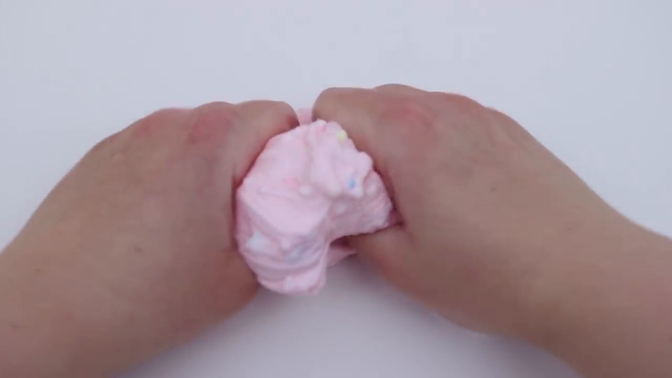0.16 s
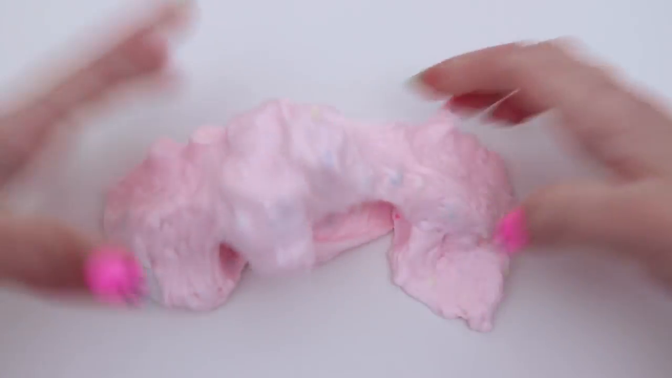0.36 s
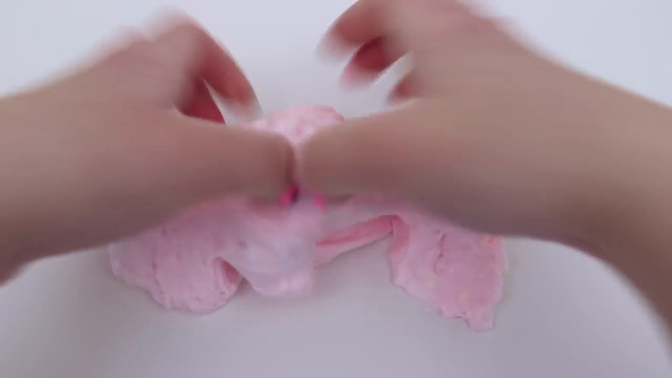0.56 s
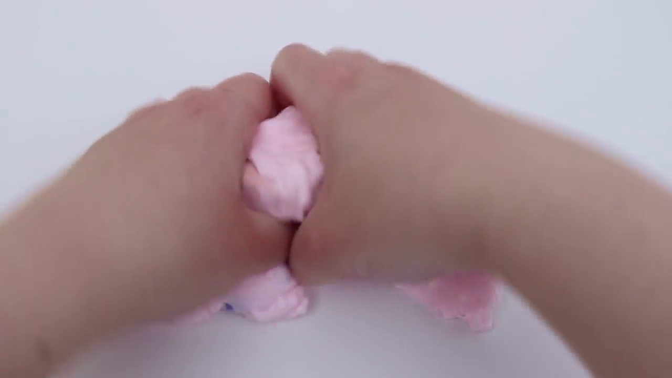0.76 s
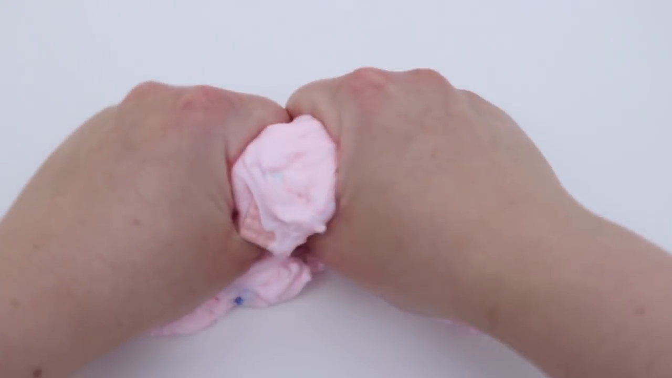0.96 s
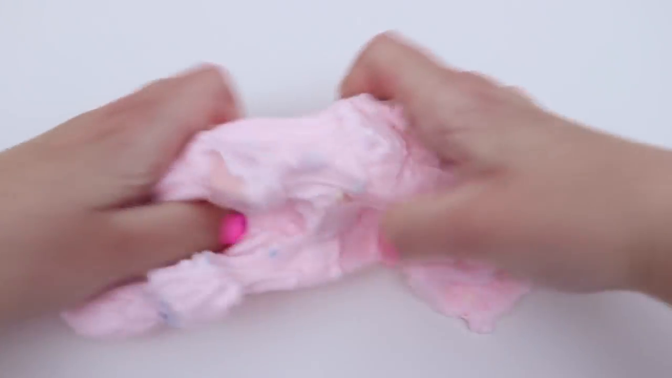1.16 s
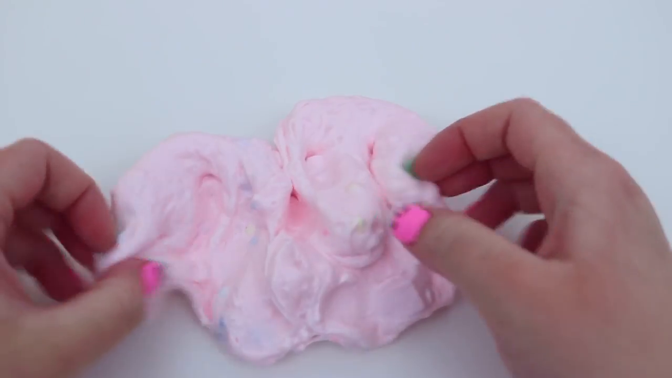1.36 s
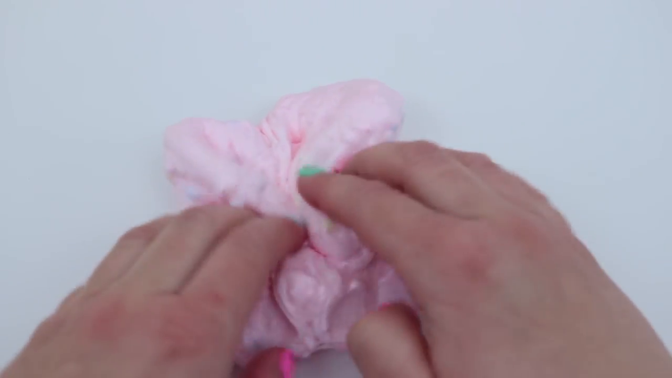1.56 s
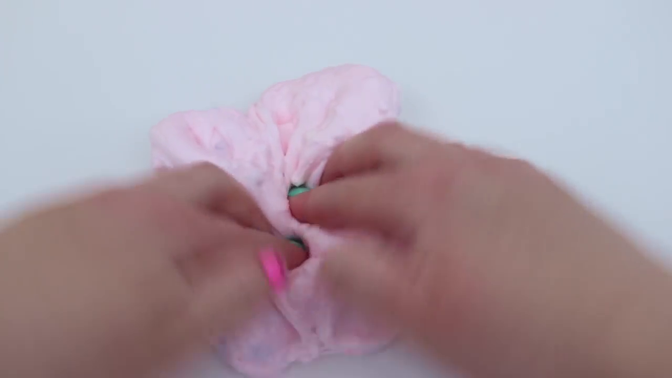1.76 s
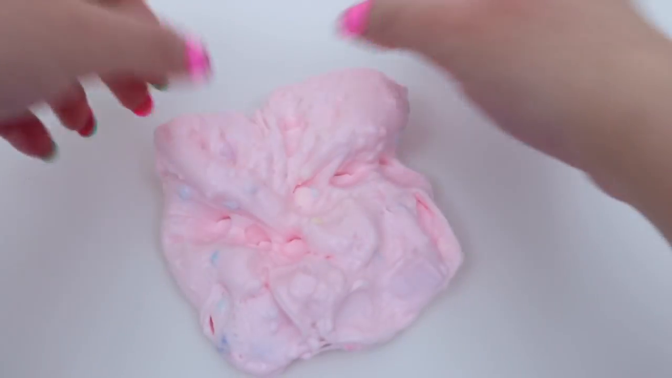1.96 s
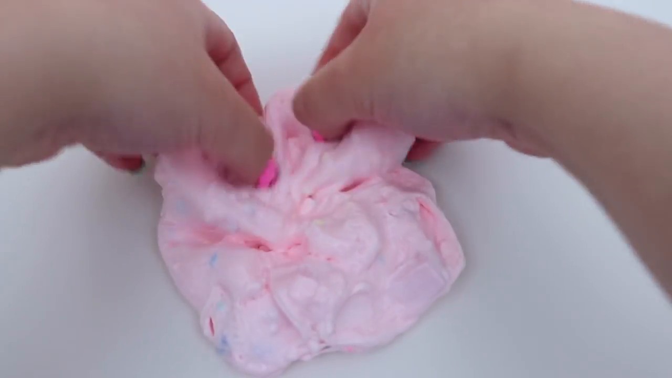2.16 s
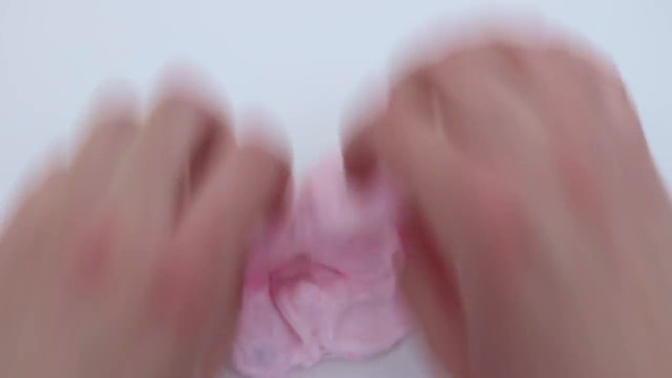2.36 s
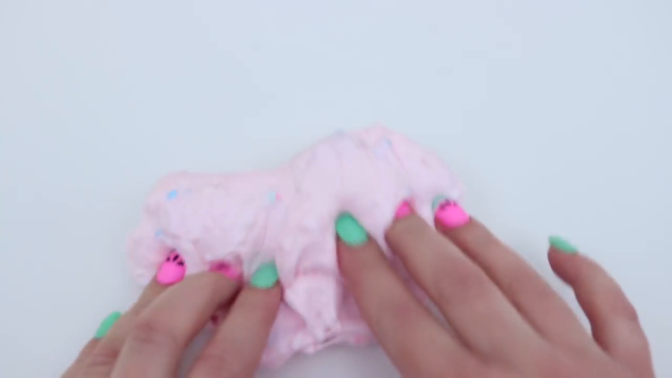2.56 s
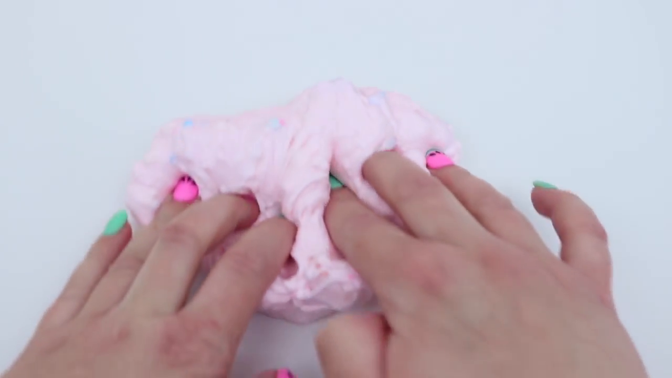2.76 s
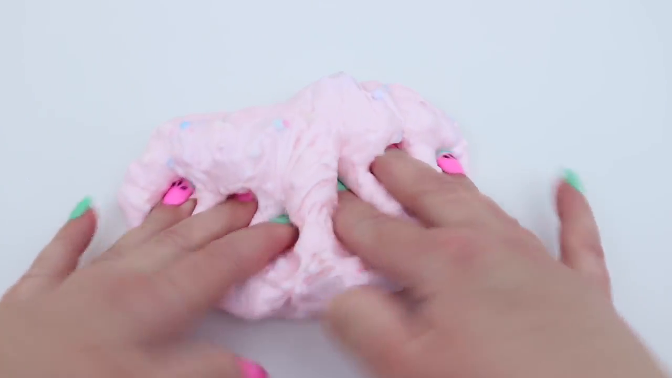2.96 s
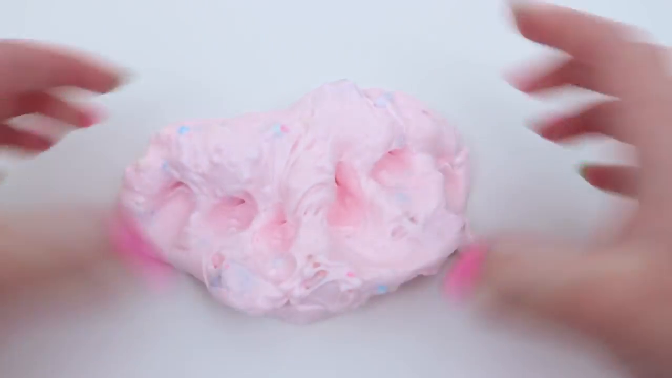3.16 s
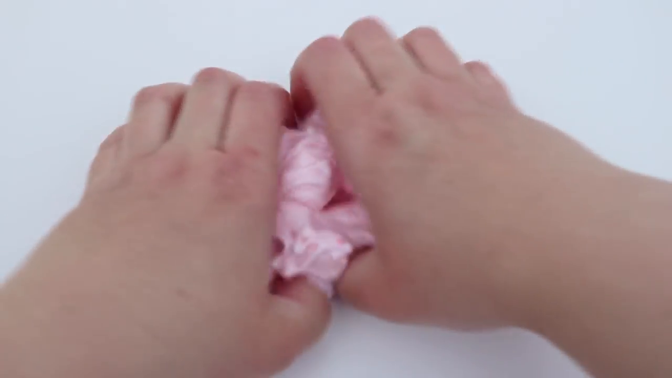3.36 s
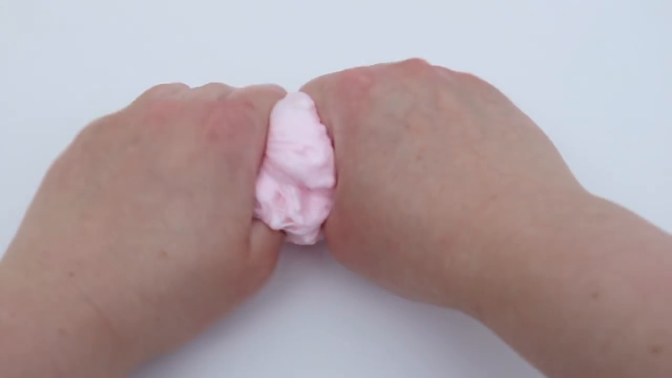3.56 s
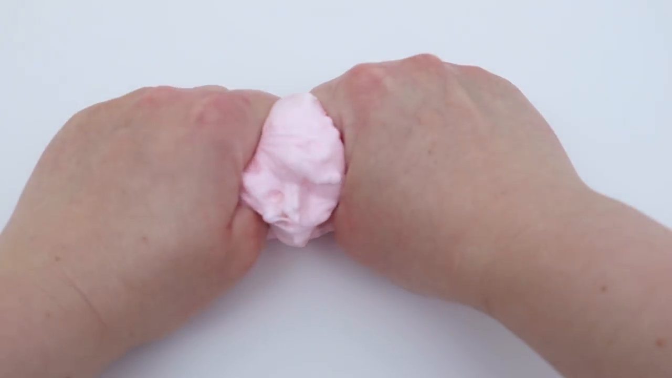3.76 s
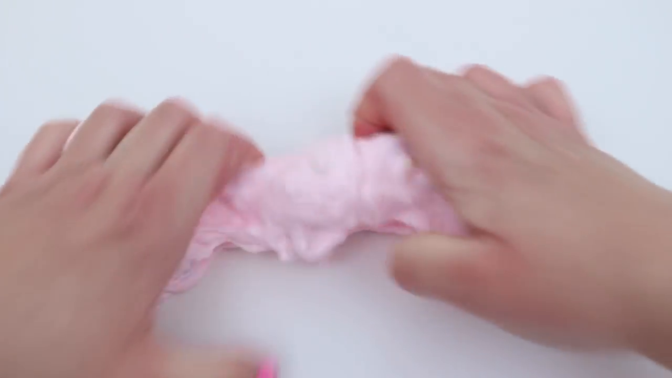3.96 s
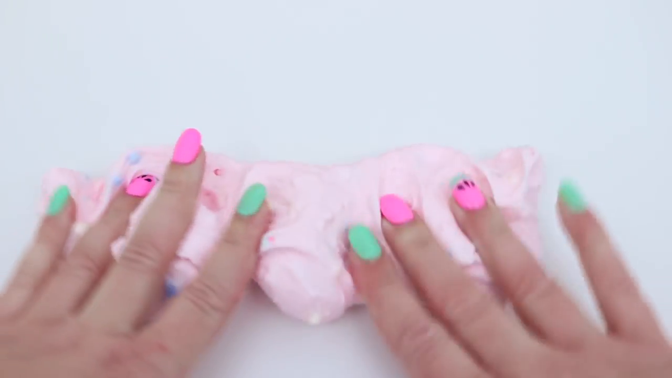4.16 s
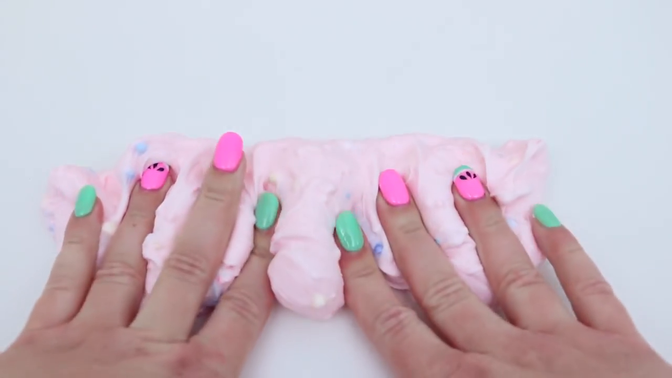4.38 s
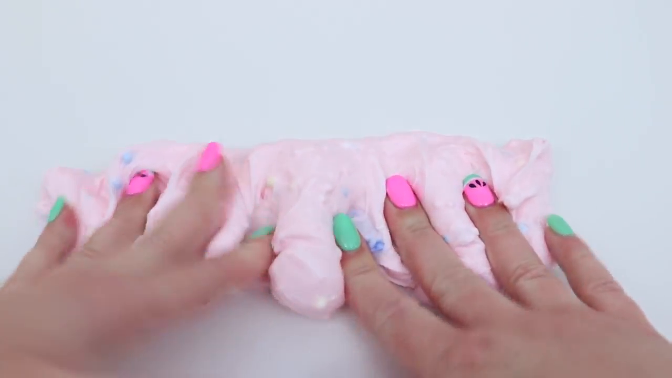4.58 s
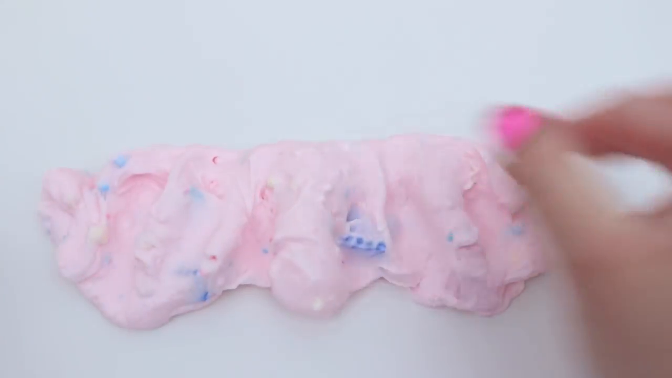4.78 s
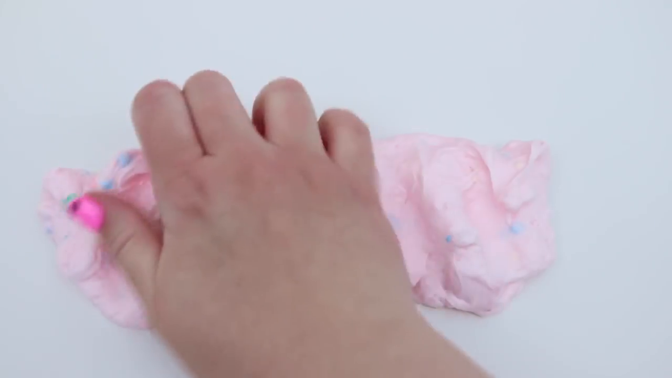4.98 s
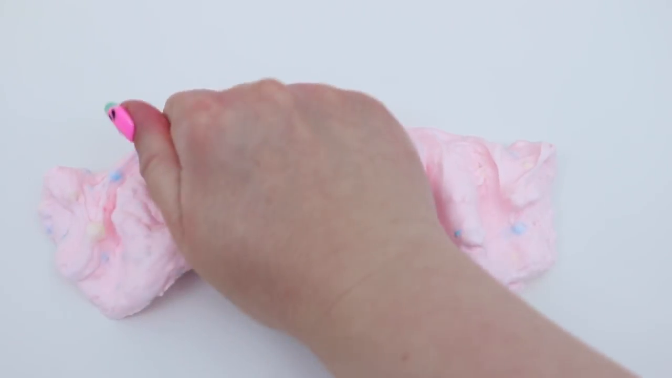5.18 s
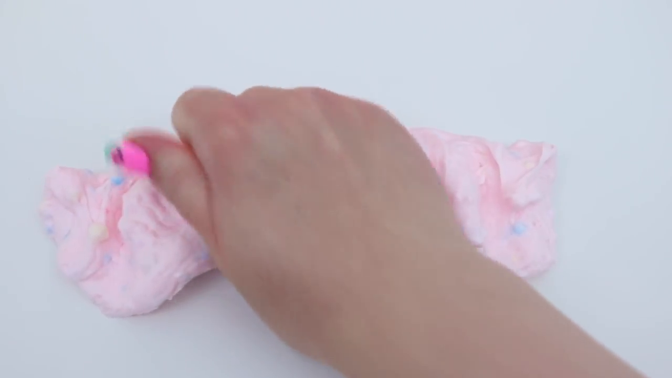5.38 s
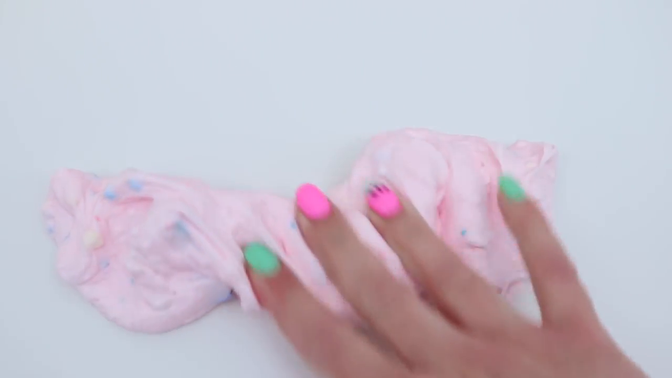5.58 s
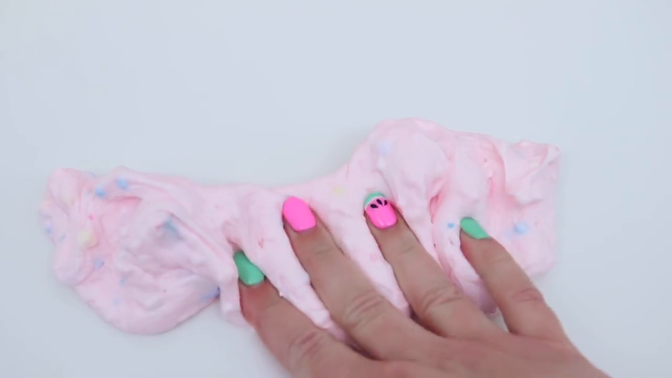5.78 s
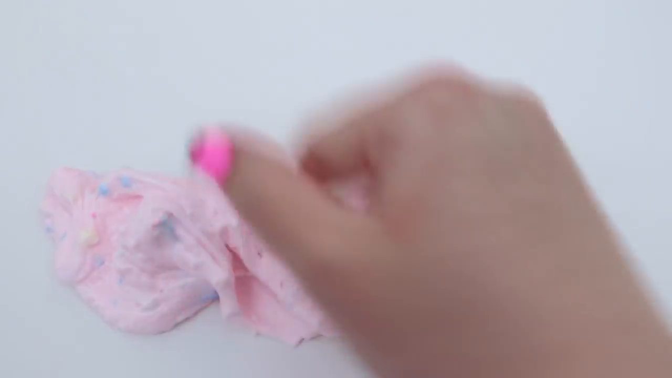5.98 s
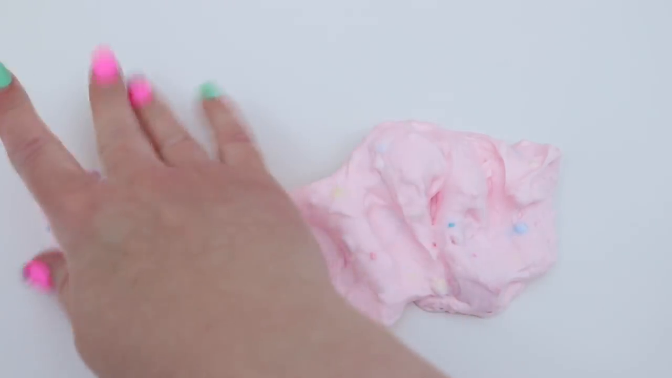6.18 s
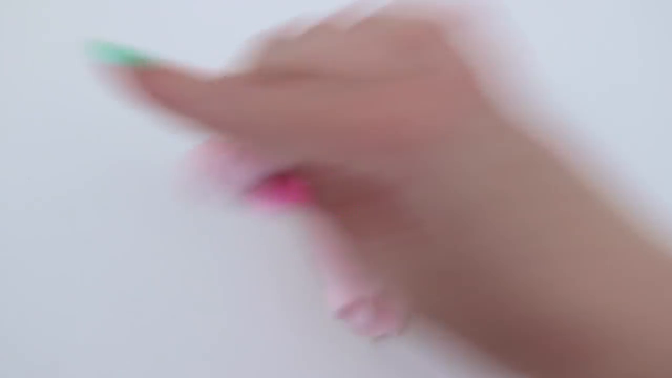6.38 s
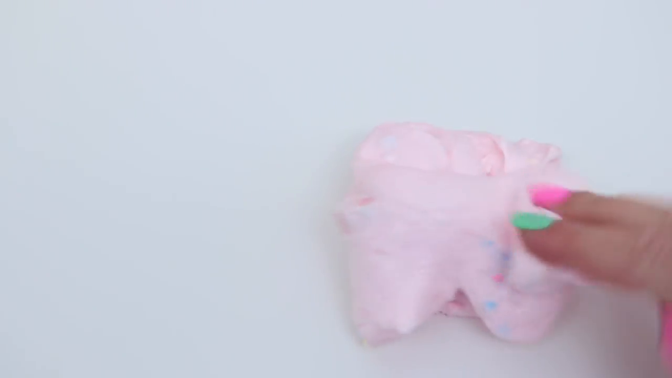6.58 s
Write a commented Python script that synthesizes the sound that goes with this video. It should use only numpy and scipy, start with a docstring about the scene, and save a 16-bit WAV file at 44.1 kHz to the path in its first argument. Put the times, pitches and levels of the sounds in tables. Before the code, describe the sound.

Hands knead sticky, bead-filled slime on a hollow table top, close to the microphone in a small quiet room. Each squeeze brings a dense wet crackle and a cluster of sharp little air pops, with brief lulls between strokes. Soft low thumps come from the table as the hands press down. The popping is loudest a little past halfway, eases off, returns in another flurry, then thins to faint ticks.

```python
"""A small quiet room: hands knead bead-filled slime on a hollow table top, close to the microphone.
Trapped air pockets burst as short pitched pops over a dense sticky crackle of tiny ones.
Pushes and fingertip knocks set the table top humming; shifts of weight bounce it on its legs.
A near wall and the room answer every pop, over faint room air and preamp noise."""
import sys
import numpy as np
from scipy import signal
from scipy.fft import rfft, irfft
from scipy.io import wavfile
from scipy.ndimage import uniform_filter1d

SR = 44100
rng = np.random.default_rng(int(sys.argv[2]) if len(sys.argv) > 2 else 0)


def pcm_store(signal):
    """Save signal as 16-bit PCM."""
    levels = np.round(np.clip(np.atleast_2d(signal), -1, 1) * 32767)
    wavfile.write(sys.argv[1], SR, levels.astype(np.int16).T)


N = 292383


def from_db(db):
    """Decibels to gain; from_db(2 * db) is power."""
    return 10 ** (np.asarray(db) / 20)


def unit_rms(x):
    """Scale to unit rms."""
    return x / np.sqrt(np.mean(x ** 2) + 1e-20)


def highpass(x, hz, order):
    """Butterworth high-pass."""
    return signal.sosfilt(signal.butter(order, hz, "high", fs=SR, output="sos"), x)


def ring(drive, hz, t60_s):
    """One mode: a unit click starts a decaying sine of height 1."""
    r, w = from_db(-60 / (t60_s * SR)), 2 * np.pi * hz / SR
    return signal.lfilter([np.sin(w)], [1, -2 * r * np.cos(w), r * r], drive + 1e-18)


def grains(per_s, spread_db):
    """Random clicks of uneven size and sign."""
    sizes = from_db(spread_db * np.minimum(rng.exponential(1, N), 4)) * rng.choice([-1, 1], N)
    return sizes * (rng.random(N) < per_s / SR)


def shaped_noise(size, spectrum):
    """Noise with a spectrum of (frequency [Hz], level [dB]) points."""
    hz, db = np.transpose(spectrum)
    bins_hz = np.maximum(np.fft.rfftfreq(size, 1 / SR), 1)
    gain = from_db(np.interp(np.log(bins_hz), np.log(hz), db))
    return irfft(rfft(rng.standard_normal(size)) * gain, size)


def swell(peak_s, swell_s, fade_s):
    """Power envelope peaking at 1: up 20 dB in swell_s, down 20 dB in fade_s."""
    t = np.arange(N) / SR - peak_s
    return 100. ** -np.where(t < 0, -t / swell_s, t / fade_s)


def air(level_db):
    """Steady room air and preamp noise."""
    # noise spectrum: (frequency [Hz], relative density [dB])
    spectrum = [(18, -25), (30, -12), (79, -5.5), (157, -5), (199, -5), (461, -17.5), (584, -26),
                (937, -25), (1130, -25), (3770, -36.5), (16000, -32)]
    return from_db(level_db) * unit_rms(shaped_noise(N + N % 2, spectrum)[:N])


def room(x):
    """Direct sound, two near echoes and a tail that dies band by band."""
    # reverberation bands: (centre [Hz], t60 [s], relative density [dB])
    tail_bands = [(350, .25, -8), (830, 0.08, -1), (2050, .2, 6), (3700, 0.23, 5.5), (6000, 0.053, -6),
                  (9000, 0.092, 4), (14000, 0.033, -13.5)]
    # early reflections: (delay [s], level [dB])
    echoes = [(.0042, -20), (.0095, -33)]
    tail_db, build_up_s = -16, 0.00067
    size = SR // 2
    t, response = np.arange(size) / SR, np.zeros(size)
    for hz, t60_s, db in tail_bands:
        band = shaped_noise(size, [(hz / 2, -30), (hz / 1.3, 0), (hz * 1.3, 0), (hz * 2, -30)])
        response += from_db(db - 60 * t / t60_s) * band
    response *= 1 - np.exp(-t / build_up_s)
    response *= from_db(tail_db) / np.sqrt(np.sum(response ** 2))
    response[0] = 1
    for delay_s, db in echoes:
        response[round(delay_s * SR)] += from_db(db)
    return signal.fftconvolve(x, response)[:N]


def kneading():
    """Strokes add in power over resting fingers; returns crackle level, treble ratio and push [dB]."""
    # fingers resting in the slime: (time [s], crackle [dB], push [dB])
    rest = [(0, -67, -60.5), (.5, -80, -59.5), (.7, -67, -68), (1.45, -62, -53), (2.05, -65.5, -68),
            (2.55, -62, -56.5), (2.8, -56.5, -49), (2.97, -73, -74), (3.17, -65, -48), (3.3, -75, -60.5),
            (3.8, -55, -72), (4.3, -65, -58), (4.9, -66.5, -63.5), (5.9, -71, -70), (6.05, -69, -58.5),
            (6.23, -67.5, -59), (6.63, -62, -59)]
    # squeezes and pulls: (peak [s], swell [s], fade [s], crackle [dB], treble ratio [dB], push [dB])
    strokes = [(0.001, .02, 0.28, -38, -6.5, -42.5), (.12, .02, 0.031, -34.5, -1, -37),
               (.343, 0.22, 0.083, -39, -6, -34), (0.41, 0.033, 0.022, -46.5, -4, -30.5),
               (0.679, 0.011, 0.12, -41, -4.5, -37.5), (.854, 0.13, 0.093, -42.5, -13.5, -35),
               (.894, .07, 0.25, -40.5, -5.5, -51), (1.006, .05, 0.064, -33.5, -3.5, -41.5),
               (1.187, .085, .2, -40, -6, -40), (1.519, 0.03, 0.056, -50, -6.5, -39),
               (1.74, .4, 0.078, -52.5, -7.5, -46), (1.846, 0.029, 0.095, -46.5, 3.5, -24),
               (1.884, 0.051, 0.033, -36.5, -23, -29.5), (1.901, 0.15, .012, -49, -8, -36),
               (2.107, 0.0099, 0.077, -47.5, -17, -45), (2.194, 0.011, 0.26, -44, -11, -38.5),
               (2.426, 0.038, 0.086, -44, -4, -40.5), (2.842, 0.024, 0.11, -49, -1, -42.5),
               (3.02, 0.018, 0.092, -55, -1, -48), (3.045, 0.05, 0.098, -40.5, -3, -26.5),
               (3.109, 0.071, 0.01, -37.5, -4.5, -25), (3.326, 0.0055, 0.21, -37.5, -23.5, -29),
               (3.52, 0.051, 0.1, -36.5, -10.5, -26), (3.616, .2, 0.036, -37, -2, -59),
               (3.678, 0.055, 0.1, -38, 1, -39), (3.903, 0.0085, 0.36, -39.5, -8, -31),
               (3.989, 0.077, 0.079, -29.5, -7.5, -23), (4.095, 0.044, 0.039, -48.5, -4, -35.5),
               (4.147, 0.12, .02, -48, -1, -37), (4.439, .03, 0.089, -63.5, 5, -55),
               (4.563, 0.013, 0.18, -54, 3.5, -45.5), (4.599, 0.048, 0.17, -45.5, -4.5, -34),
               (4.759, 0.066, 0.024, -46, -4.5, -31.5), (4.91, 0.0295, 0.26, -62, -15, -70.5),
               (5.067, 0.024, 0.41, -44, -35, -44), (5.18, 0.096, 0.13, -37.5, -4.5, -43.5),
               (5.259, .1, 0.041, -49.5, 0, -39.5), (5.428, 0.036, 0.1, -40, -5, -34.5),
               (5.52, 0.17, 0.012, -45.5, -20, -38.5), (5.572, 0.0064, 0.072, -35, -38, -30.5),
               (5.771, .4, 0.12, -56.5, -5, -50), (5.964, 0.039, 0.059, -40.5, -2, -30.5),
               (6.02, 0.21, 0.0101, -48, -1.5, -38.5), (6.322, .08, 0.21, -47.5, -12.5, -45.5),
               (6.447, 0.26, 0.017, -55, 0.5, -67), (6.614, 0.0297, .1, -61, -15, -51.5)]
    rest_treble_db = -5.5
    t = np.arange(N) / SR
    rest_s, rest_crackle_db, rest_push_db = np.transpose(rest)
    body = from_db(2 * np.interp(t, rest_s, rest_crackle_db))
    treble = body * from_db(2 * rest_treble_db)
    push = from_db(2 * np.interp(t, rest_s, rest_push_db))
    for peak_s, swell_s, fade_s, crackle_db, treble_db, push_db in strokes:
        envelope = swell(peak_s, swell_s, fade_s)
        body += from_db(2 * crackle_db) * envelope
        treble += from_db(2 * (crackle_db + treble_db)) * envelope
        push += from_db(2 * push_db) * envelope
    return 10 * np.log10([body, treble / body, push])


def table_legs():
    """Shifts of weight bounce the table on its legs."""
    # weight shifts: (peak [s], level [dB])
    shifts = [(0.339, -45), (.88, -45.5), (1.39, -56), (1.6, -58), (1.88, -37), (1.98, -44), (2.48, -48),
              (3.1, -35), (3.34, -67), (3.51, -71), (3.99, -45), (4.16, -37), (4.76, -42.5), (5.08, -44.5),
              (5.32, -58), (5.52, -43), (6.029, -38.5), (6.2, -54.5)]
    rest_db, coupling_db = -59, -32
    power = sum(from_db(2 * db) * swell(peak_s, swell_s=0.044, fade_s=0.062) for peak_s, db in shifts)
    force = np.sqrt(power + from_db(2 * rest_db)) * rng.standard_normal(N)
    return ring(from_db(coupling_db) * force, hz=64, t60_s=.16)


def table(push_db):
    """Soft uneven palm pushes and knocks ring the hollow top, over the bounce of the legs."""
    # table top modes: (frequency [Hz], gain [dB], t60 [s])
    modes = [(127, -17.5, 0.25), (227.8, -8, 0.19), (255.8, -12.5, 0.22), (332, 3, 0.1), (452, -0.5, 0.04),
             (563, -10.5, 0.086), (820, -18, 0.029), (900, -16.5, 0.033)]
    # fingertips knocking through the slime: (time [s], level [dB])
    fingertips = [(0.113, -36.5), (0.308, -36), (0.405, -31), (0.676, -37.5), (0.846, -32), (1.005, -35),
                  (1.513, -36), (1.831, -34), (2.187, -42), (3.319, -28), (3.518, -24), (3.665, -30),
                  (3.895, -36.5), (3.926, -26), (3.98, -20.5), (4.088, -35), (4.144, -35), (5.229, -31.5),
                  (5.566, -26.5)]
    push_coupling_db, knock_coupling_db = -31.5, -7.5
    knock_s, knock_db = np.transpose(fingertips)
    knocks = np.zeros(N)
    knocks[(knock_s * SR).astype(int)] = from_db(knock_db + knock_coupling_db)
    hum = table_legs()
    for hz, db, t60_s in modes:
        pushes = from_db(push_db + push_coupling_db) * unit_rms(grains(per_s=400, spread_db=2.7))
        hum += from_db(db) * ring(pushes + knocks, hz, t60_s)
    softened = signal.lfilter([.2], [1, -.8], hum)
    return highpass(softened, hz=50, order=2)


def crackle(level_db, treble_db):
    """Countless tiny pockets burst in clumps at all pitches; harder kneading bursts more of them."""
    base_per_s, clump_db, t60_cycles, split_hz, hiss_db = 3000, 5, 2.2, 5000, -6
    pitches_hz = np.geomspace(600, 15000, 18)
    effort = from_db(.3 * (level_db + 50))
    clumps = from_db(clump_db * unit_rms(uniform_filter1d(rng.standard_normal(N), size=500)))
    clicks = unit_rms(grains(base_per_s * effort * clumps, spread_db=4))
    pitch_index = rng.integers(0, len(pitches_hz), N)
    hiss = from_db(hiss_db) * rng.standard_normal(N) / np.sqrt(len(pitches_hz))   # film sliding on skin
    body, treble = np.zeros(N), np.zeros(N)
    for k, hz in enumerate(pitches_hz):
        drive = clicks * (pitch_index == k) + np.roll(hiss, 999 * k)   # shift decorrelates the bands
        band = body if hz < split_hz else treble
        band += ring(drive, hz, t60_cycles / hz)
    sticky = from_db(level_db) * (unit_rms(body) + from_db(treble_db) * unit_rms(treble))
    return highpass(sticky, hz=500, order=2)


def pops():
    """Each pocket rings a few cycles, rising in pitch as its film snaps open; a near wall echoes it."""
    # bursting air pockets: (time [s], level [dB], pitch [Hz], snap re tone [dB])
    pockets = [(.0183, -27.5, 7160, 0), (0.0531, -7.5, 4330, 1), (.064, -20.5, 4280, 1),
               (0.0662, -11, 3520, -2), (.0883, -7.5, 8000, -2), (.1104, -4.5, 1760, 4.5),
               (.122, -34, 9000, 16), (0.1908, -9, 6600, -2), (.2448, -26.5, 3960, -10),
               (0.3122, -22.5, 3860, -6), (.654, -36, 4200, 2), (0.676, -13, 3900, 2.5),
               (0.68, -16, 4130, -1), (0.7892, -24, 13200, 5), (0.8128, -14.5, 3350, 25),
               (.8485, -34, 13400, 8), (.871, -4.5, 1820, -3.5), (.8845, -23, 2000, -13),
               (0.902, -10, 2100, 1), (0.9344, -20, 1510, -18), (.94, -14.5, 2050, 10),
               (0.95, -7.5, 3850, 0), (.9683, -19, 6010, -9), (0.9918, -4, 11250, -5),
               (0.9939, -5, 11500, -4.5), (1.0063, -6.5, 1290, 2), (1.0307, -21, 9640, -1),
               (1.1896, -23.5, 3020, -30), (1.2561, -21, 3600, -5.5), (1.276, -28, 8000, 3),
               (1.2895, -21.5, 6350, 12), (1.3685, -31, 14860, 10), (1.4395, -24.5, 2950, 22),
               (1.4895, -35, 9000, -12), (1.5427, -38, 13700, -4), (1.5645, -16.5, 13000, -2),
               (1.582, -24.5, 3700, 23), (1.6132, -25.5, 11600, 0), (1.646, -31, 3560, 1),
               (1.6632, -24.5, 8900, -2.5), (1.7532, -24, 3420, 7), (1.772, -31, 9000, 12),
               (1.8298, -18, 8900, 4), (2.099, -23.5, 3600, -3.5), (2.180, -34, 10000, -8),
               (2.189, -13.5, 3850, 1), (2.3095, -37, 10100, 0), (2.4160, -25, 11400, 1),
               (2.4272, -29, 604, -25), (2.452, -31, 860, -26), (2.5333, -20, 7550, -2),
               (2.5811, -29, 9800, -7), (2.6773, -37, 12400, 1), (2.6849, -31.5, 4600, 21),
               (2.7787, -38, 3340, 9), (2.7851, -30, 8500, 13), (2.811, -40, 6000, 8),
               (2.83, -9.5, 8400, -0.5), (3.0157, -23, 2650, 18), (3.0335, -15.5, 8750, -26),
               (3.0423, -21, 8450, 15), (3.0552, -17, 8700, 15), (3.3224, -11.5, 3620, -10),
               (3.3506, -22.5, 3700, -17), (3.3561, -18.5, 7120, -2.5), (3.406, -26, 9000, 3),
               (3.4175, -31, 9000, 1), (3.4427, -18, 3600, -1), (3.4952, -24.5, 1870, -13),
               (3.5024, -12, 10600, -8.5), (3.517, -8, 994, -10), (3.5244, -13, 8900, -16),
               (3.537, -11.5, 2294, -26), (3.559, -1, 12600, -1.5), (3.5664, -12, 7400, -20),
               (3.5735, -8, 1760, -27.5), (3.599, 7.5, 13590, -15.5), (3.6085, -4, 9000, 0.5),
               (3.6426, -13.5, 3360, 12.5), (3.6668, 7, 11600, -5.5), (3.669, -16.5, 1820, -13.5),
               (3.674, -9, 7350, 0.5), (3.7002, -25.5, 10900, -8.5), (3.7082, -16.5, 12200, -9.5),
               (3.7415, -21.5, 10040, -15), (3.7737, -9, 14800, -16.5), (3.8468, -47, 8040, 3),
               (3.8715, -44, 10100, 3), (3.8951, -22, 1940, -7.5), (3.9058, -24.5, 8900, -20),
               (3.9237, -27.5, 1950, 2.5), (3.932, -19, 1607, -29.5), (3.9807, -4.5, 3760, -13.5),
               (3.9832, -2, 4060, 2.5), (4.08, -24, 9750, -2), (4.1289, -26, 3580, 18),
               (4.2455, -43, 1260, -23), (4.2745, -51, 1300, -3), (4.358, -42.5, 1820, -1),
               (4.408, -34.5, 4520, 5.5), (4.4207, -24.5, 8050, -29), (5.0383, -33, 9800, 0),
               (5.051, -17, 9570, 7), (5.0648, -4.5, 1807, -33), (5.074, -22, 1850, -34),
               (5.1073, -26, 692, -27), (5.1445, -33, 9000, 5), (5.1591, -19, 3600, -25),
               (5.1606, -23, 2670, -27), (5.1745, -3, 4000, 3), (5.1811, -8.5, 10500, -.5),
               (5.193, -12.5, 7400, -6), (5.2189, -13, 2060, 3), (5.2317, -21, 1900, -26),
               (5.2802, -29, 10400, -8), (5.293, -17, 15600, 4), (5.4106, -31, 1840, -9),
               (5.5673, -8, 1880, -1), (5.5802, -20.5, 616, -34), (5.6624, -29.5, 8340, 2),
               (5.69, -36, 11000, 0), (5.7316, -27.5, 9000, 8), (5.7725, -26.5, 7200, 15),
               (5.8007, -33, 9000, 1), (5.855, -42, 11000, 1), (6.2861, -30.5, 3940, -1.5),
               (6.3285, -26, 7100, 15), (6.359, -32, 9000, -1), (6.4407, -40, 770, -13),
               (6.549, -36, 9000, 13), (6.606, -37.5, 636, -17)]
    t60_at_1khz_s, t60_exponent, tear_s = 0.0031, 0.83, .0002
    wall_s, wall_spread_s, wall_db, wall_spread_db = .00227, .00006, -9.5, 2.2
    out, t = np.zeros(N + 600), np.arange(400) / SR
    for start_s, db, hz, snap_db in pockets:
        place, facing = rng.standard_normal(2)   # vary the wall echo
        t60_s = t60_at_1khz_s * (1e3 / hz) ** t60_exponent   # small high pockets die sooner
        cycles = hz * t
        envelope = (1 - np.exp(-cycles / .7)) ** 2 * from_db(-60 * t / t60_s)
        glide = .96 + .015 * np.minimum(cycles, 6)
        tone = envelope * np.sin(2 * np.pi * cycles * glide)
        tear = rng.standard_normal(len(t)) * np.exp(-t / tear_s)
        snap = signal.lfilter([1], [1, -.45], tear)   # wet film tears with some body
        snap *= from_db(snap_db) * np.sqrt(np.sum(tone ** 2) / np.sum(snap ** 2))
        pop = from_db(db) * (tone + snap) / np.abs(tone + snap).max()
        direct_at = round(start_s * SR)
        echo_at = round((start_s + wall_s + wall_spread_s * place) * SR)
        out[direct_at:direct_at + len(t)] -= pop
        out[echo_at:echo_at + len(t)] -= pop * from_db(wall_db + wall_spread_db * facing)
    return highpass(out[:N], hz=380, order=4)   # a small source radiates no bass


def scene():
    """Slime in the room, table and air; mono."""
    crackle_db, treble_db, push_db = kneading()
    slime = pops() + crackle(crackle_db, treble_db)
    return (room(slime) + table(push_db) + air(level_db=-69))[None]


def record(dry):
    """Microphone colour, clipping under full scale, steep low-pass."""
    # microphone peaks and dips: (centre [Hz], width [Hz], gain [dB])
    colour = [(1825, 440, 2), (3600, 540, 5), (5160, 2100, -2), (11600, 12800, 3.5), (15600, 7600, -6)]
    ceiling, cutoff_hz = .92, 16900
    x = dry
    for hz, width_hz, db in colour:
        b, a = signal.iirpeak(hz, hz / width_hz, SR)
        x = x + (from_db(db) - 1) * signal.lfilter(b, a, x)
    x = np.clip(x, -ceiling, ceiling)
    return signal.sosfilt(signal.cheby2(20, 80, cutoff_hz, fs=SR, output="sos"), x)


dry = scene()
out = record(dry)
pcm_store(out)
```